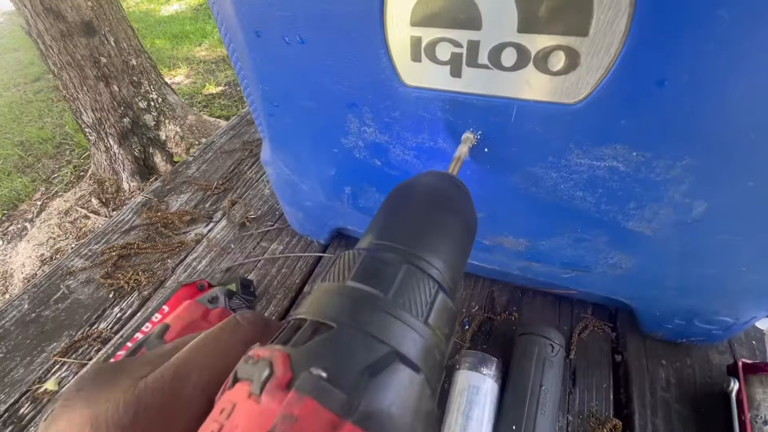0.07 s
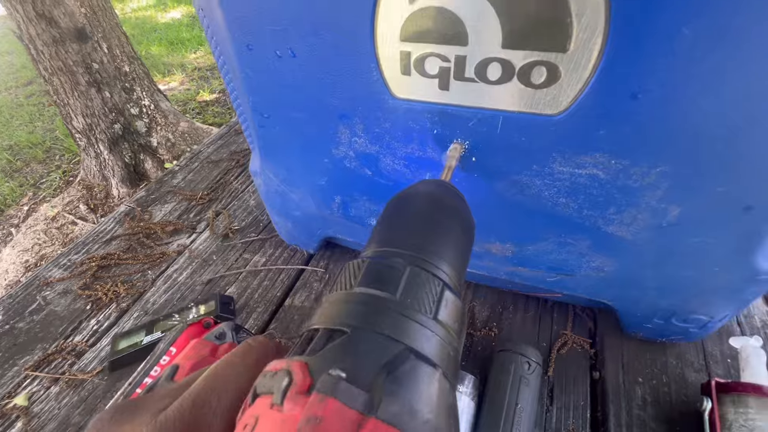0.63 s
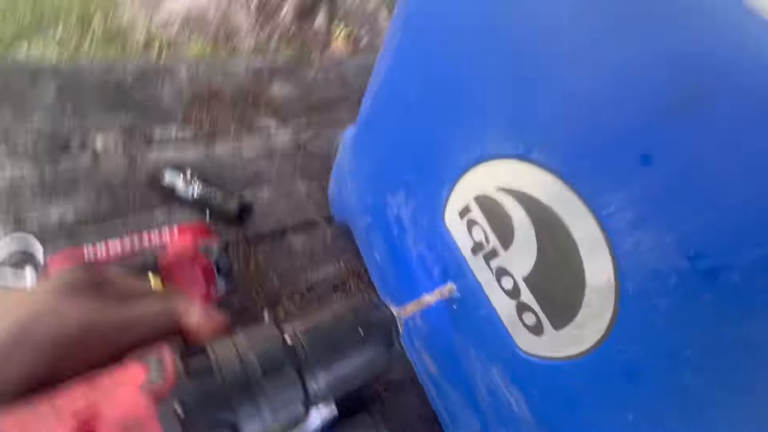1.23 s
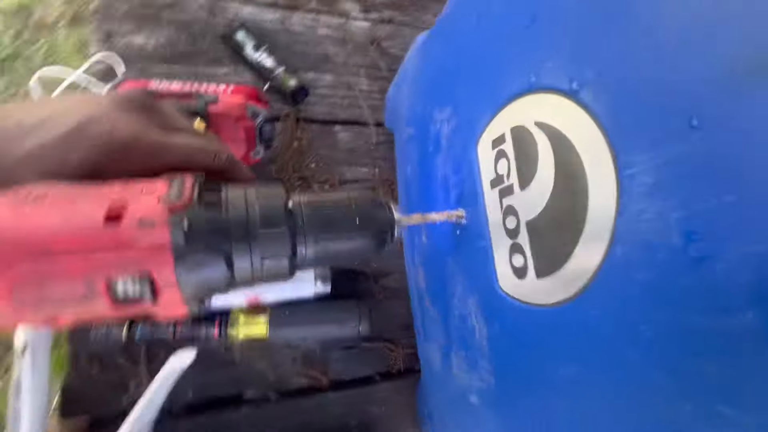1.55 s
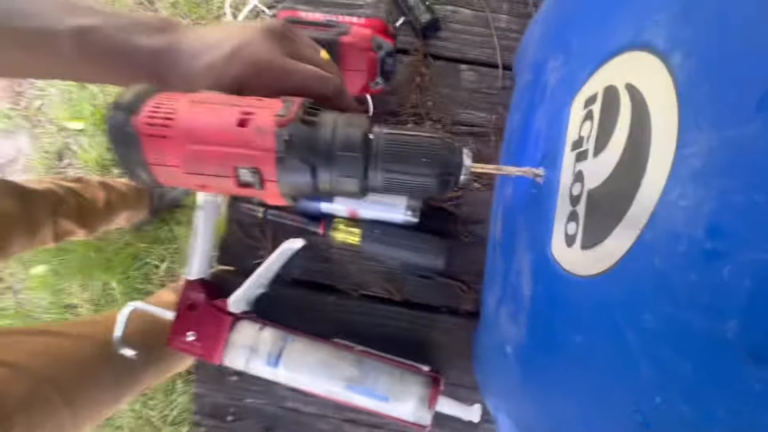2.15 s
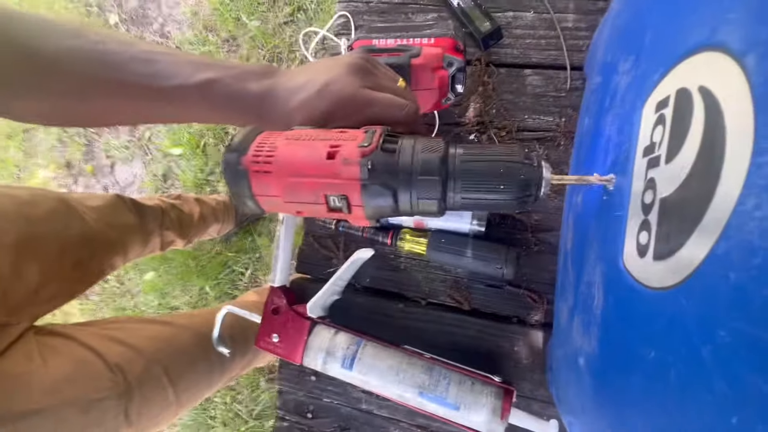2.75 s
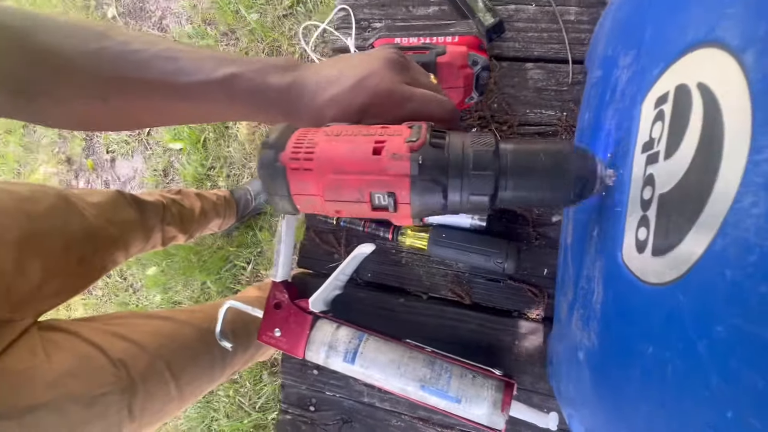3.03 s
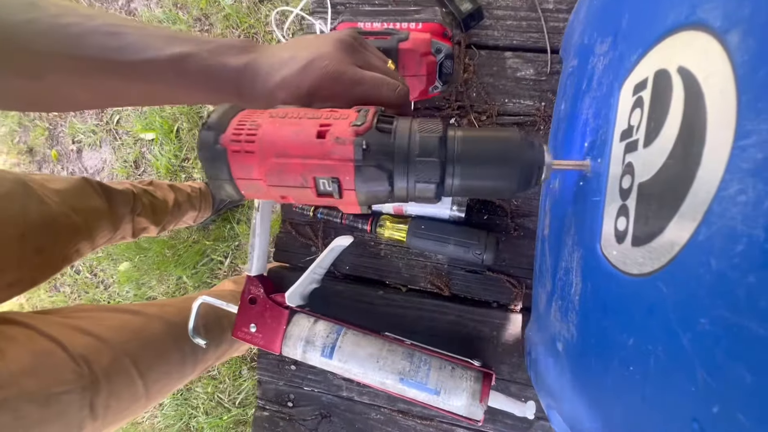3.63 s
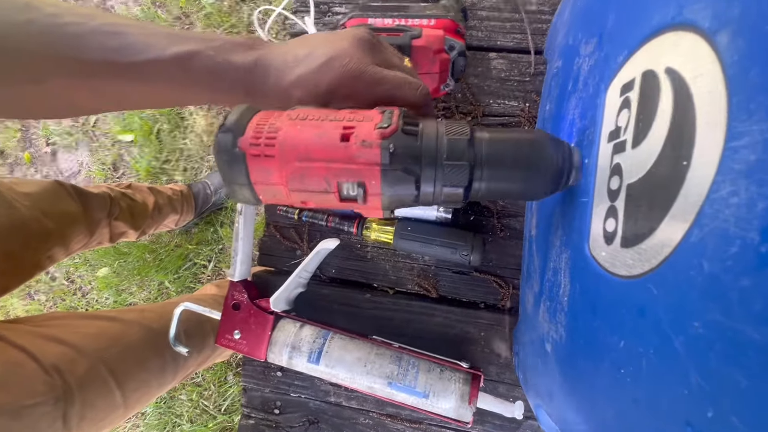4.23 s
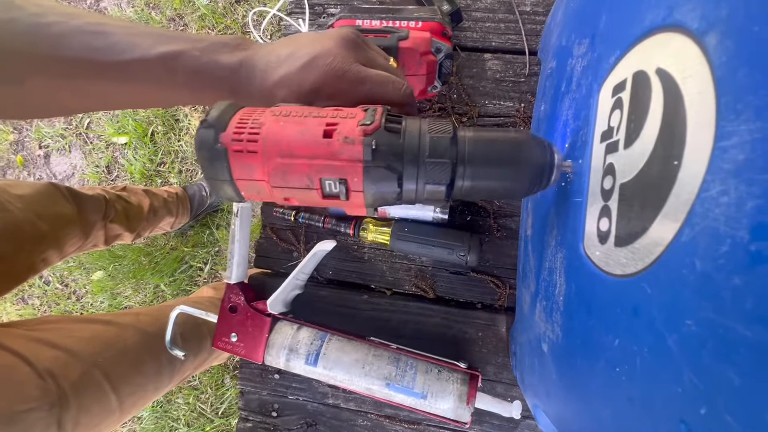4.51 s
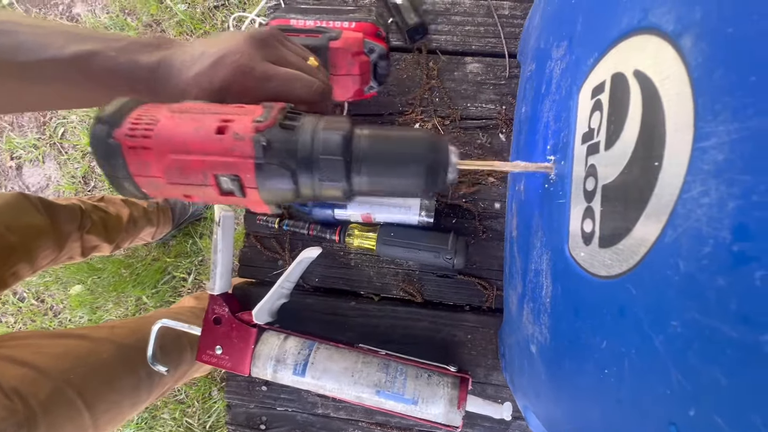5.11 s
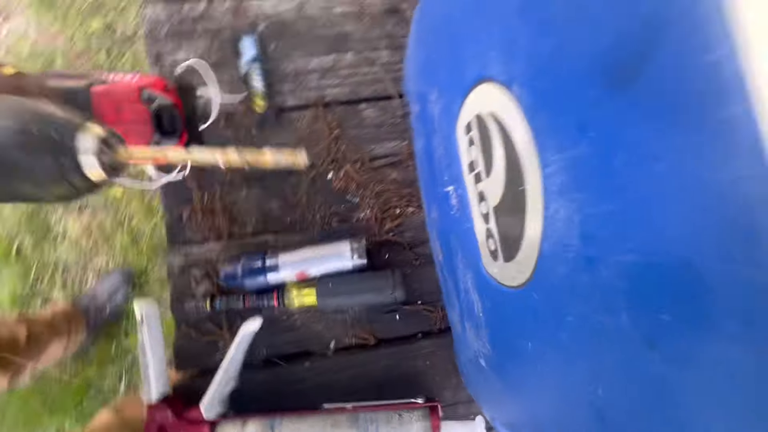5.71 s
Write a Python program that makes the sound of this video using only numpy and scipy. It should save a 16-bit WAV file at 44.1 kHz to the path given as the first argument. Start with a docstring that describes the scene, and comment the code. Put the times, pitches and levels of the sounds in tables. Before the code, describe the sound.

A cordless drill whines and rattles into the hollow plastic wall of a cooler for under a second and stops with a sharp clack. The tool bumps and rubs lightly on the plastic. A brief burst leads into a longer run that slows and partly recovers, with crackling chips, hollow drumming and a thin whistle, ending in another clack. It is outdoors, close to a phone microphone, with handling rumble, soft hiss and a low hum.

```python
"""A cordless drill whines and rattles into a cooler's hollow plastic wall: a short run, a brief burst,
a long run. Outdoors, on a phone's two microphones, close to the tool. The gears follow the motor's
speed, the controller whistles at part trigger, and the bit catches and slips, drumming the wall.
The spindle lock clacks at each stop; between runs the tool bumps and rubs on the cooler.
Behind it all lie handling rumble, a soft hiss and a low outdoor hum."""
import sys
import numpy as np
from scipy import signal
from scipy.fft import rfft, irfft, next_fast_len
from scipy.io import wavfile
from scipy.ndimage import uniform_filter1d

SR = 44100
rng = np.random.default_rng(int(sys.argv[2]) if len(sys.argv) > 2 else 0)


def wav_record(signal):
    """Record a signal, one row per channel, as 16-bit PCM in the file named by sys.argv[1]."""
    frames = np.transpose(np.atleast_2d(signal))
    bounded = np.clip(frames, -1, 1)
    # unit amplitude maps onto the largest positive 16-bit level
    quanta = np.round(bounded * 32767).astype(np.int16)
    wavfile.write(sys.argv[1], SR, quanta)


N = 258029
TIME = np.arange(N) / SR

# Levels are relative: each source adds its own trim and pan.
# motor speed under trigger and load, one curve per run: t/s, f/Hz
MOTOR_SPEED = [
    [(0, 309), (.1, 283), (.19, 247.6), (.24, 224), (.28, 224), (.37, 247.5), (.47, 301), (.55, 316.5),
     (.62, 321.4), (.7, 322.3), (.77, 302)],
    [(2.85, 130), (2.96, 227), (3.04, 246), (3.14, 208)],
    [(3.32, 139), (3.42, 211), (3.53, 295.7), (3.6, 314.7), (3.72, 287.5), (3.82, 270.5), (3.9, 253),
     (4.24, 121), (4.45, 85), (4.65, 145.5), (4.73, 164.7), (4.82, 173), (4.97, 182.5), (5.1, 189.8),
     (5.22, 197.5), (5.31, 190.5)],
]
# trigger pulls, levels at full speed: start/s, stop/s, rattle/dB, chips/dB, drumming/dB
TRIGGER_PULLS = [(-0.1, 0.768, -27.5, -29, -30), (2.857, 3.126, -26, -25.5, -22.5),
                 (3.315, 5.303, -26, -26, -24)]
# gear whine, order 12 being the pinion's tooth mesh: multiple of the motor's turn, level/dB
GEAR_ORDERS = [(4, 6), (5, -3), (6, -1), (9, -9), (11, -11), (12, 0), (15, -10), (17, -10), (19, -11),
               (20, -11), (21, -9), (23, -5), (24, -5.5), (26, -5), (27, -7), (28, -11), (32, -8), (34, -6),
               (38, -11)]
# resonances the whine swells through: f/Hz, width/Hz, level/dB
WHINE_MODES = [(3750, 450, 1.5), (5200, 450, 1)]
# broad colour of the drill's shell: f/Hz, level/dB
HOUSING_COLOUR = [(300, -57), (1000, -7.5), (2000, -2.5), (2800, 0), (4300, 3), (6500, 3), (8000, -4),
                  (9500, -16), (15800, -8.5)]
# resonances of the shell: f/Hz, width/Hz, level/dB
HOUSING_MODES = [(3480, 250, -12.5), (5270, 220, -15), (6050, 300, -18), (7400, 300, -8), (9000, 750, 8.5),
                 (11440, 480, 13.5), (15200, 310, 6.5)]
# whistle at part trigger: start/s, stop/s, first level/dB, last level/dB
WHISTLES = [(0.257, 0.42, -33.5, -41), (2.75, 2.92, -49.5, -36), (4.247, 4.422, -50, -43),
            (4.425, 4.73, -37.5, -38), (4.774, 5.258, -42.5, -35.5)]
# resonances of bit and cut edge in the first hole: f/Hz, width/Hz, level/dB
FIRST_CUT_MODES = [(756, 340, -10.5), (1216, 54, -5.5), (1269, 48, -1.5), (1690, 61, -10.5)]
# the same in the second hole: f/Hz, width/Hz, level/dB
SECOND_CUT_MODES = [(802, 36, 3.7), (938, 62, 8.1), (1320, 430, 9.2), (1800, 120, 4.1)]
# a large chip tears off: t/s, level/dB, f/Hz
CRUNCHES = [(3.14, -25.5, 1200), (3.357, -25.5, 860), (3.432, -22, 1410), (3.597, -25, 950),
            (3.682, -24, 1680), (3.933, -31, 1150), (3.988, -21.5, 1430), (4.323, -27, 920),
            (4.566, -25.5, 644), (4.577, -20.5, 1400), (4.633, -26, 1377), (4.673, -21.5, 1534),
            (4.982, -28, 1500), (5.019, -23, 1340), (5.308, -25.5, 1150), (5.316, -27.5, 840)]
# modes of the hollow wall: f/Hz, width/Hz, level/dB
WALL_MODES = [(191.3, 29, 4.5), (267, 47, -8), (321.7, 37.3, -5.5), (426.4, 72, -9), (497, 13, -20)]
# the bit catches and drums harder: start/s, stop/s, boost/dB
CATCHES = [(0.45, 0.76, 2), (3.102, 3.15, 6), (3.318, 3.47, 3), (3.513, 3.637, 3), (4.13, 4.22, 3),
           (4.36, 4.448, 5), (4.6, 4.787, 3.5), (4.97, 5.007, 7.5), (5.052, 5.134, 5), (5.19, 5.257, 6)]
# the bit snags or the tool knocks: t/s, thump/dB, crack/dB, rebound f/Hz, mode tilt/(dB per octave)
KNOCKS = [(0.776, -6.5, -15.5, 232, 12), (0.796, -1.5, -25, 310, 3.5), (1.22, -42, -70, 217, -3),
          (1.465, -22.5, -60, 300, 0), (1.602, -31, -64, 370, 16), (1.96, -31, -54, 280, 11),
          (2.614, -3, -9.5, 383, 18), (2.706, -16, -23.5, 310, 18), (2.853, -10, -23.5, 280, 8),
          (3.103, -2, -18, 264, 15), (3.115, -6, -15, 313, -10), (3.138, 4.5, -10.5, 456, 4.5),
          (3.314, -14, -21, 452, 7), (3.405, -1, -23, 258, 20), (4.167, -5, -38, 239, 6),
          (4.193, -10, -42, 200, 2), (4.221, -14.5, -33, 220, 1), (4.631, -18.5, -36, 300, 2),
          (4.957, -6, -41, 201.9, 14), (5.054, -5.5, -38, 196, -11), (5.582, -25, -41, 260, 3),
          (5.628, -25, -35.5, 231, 6), (5.688, -26, -36, 240, -6), (5.776, -22, -59, 300, 3),
          (5.801, -30, -58, 240, 4)]
# growl through the seated bit, at full depth: multiple of the motor's turn, level/dB
GROWL_ORDERS = [(3, -52), (4, -57), (5, -50), (6, -52), (12, -55)]
# plastic creaks at rest or squeals under the bit: start/s, stop/s, first f/Hz, last f/Hz, level/dB
CREAKS_AND_SQUEALS = [(1.744, 1.765, 528, 542, -44), (4.057, 4.076, 558, 537, -23),
                      (4.12, 4.17, 485.5, 445, -29), (4.476, 4.56, 468.3, 579, -37.5),
                      (4.635, 4.655, 442, 442, -24), (4.68, 4.698, 454, 442, -25)]
# clacks and clicks of spindle lock, chuck and trigger: t/s, level/dB
CLACKS = [(0.7695, -28), (0.7723, -11), (0.8205, -35), (2.616, -23), (2.6678, -30), (2.779, -45),
          (2.849, -32.5), (3.1374, -16), (3.14, -18), (3.315, -31), (5.314, -13), (5.3173, -30)]
# light taps of handling: t/s, level/dB, f/Hz
TICKS = [(1.352, -42, 340), (1.4625, -30.5, 486), (1.604, -48, 430), (1.742, -44, 1310), (1.744, -46, 8600),
         (2.095, -26.5, 1510), (2.1165, -25.5, 1440), (5.458, -46, 500), (5.564, -44, 900),
         (5.6214, -44, 2600), (5.69, -44, 890)]
# the tool slides over the cooler: start/s, stop/s, level/dB
SLIDES = [(1.97, 2.16, -50.5), (2.47, 2.52, -51.5), (2.615, 2.645, -36.5)]
# the tool scrapes on the cooler: start/s, stop/s, level/dB
SCRAPES = [(5.642, 5.795, -43)]
# the hand shakes the phone: start/s, stop/s, level/dB
SHAKES = [(0.45, 0.95, -46.5), (1.14, 1.68, -46), (3.1, 3.7, -44.5), (4.53, 4.62, -34), (4.76, 5.23, -35.5),
          (4.93, 5.08, -34), (5.57, 5.66, -35.5), (5.66, 5.85, -40), (5.76, 5.84, -32)]
# air and handling on the microphones: f/Hz, level/dB
RUMBLE_COLOUR = [(22, -22), (50, 0), (75, 2), (100, 2), (130, -6), (220, -11.5), (450, -27.5), (900, -58),
                 (2000, -79)]
# spectrum of the outdoor hiss: f/Hz, level/dB
HISS_COLOUR = [(100, 14.5), (500, 10), (1000, 5), (1700, 2.5), (3000, -4), (6500, -2.5), (9000, -6.5),
               (11000, -24), (16000, -24)]
# rise and fall of that hiss: t/s, level/dB
HISS_LEVEL = [(1.0, -56), (2.4, -49), (3.2, -43.5), (5.5, -48.5)]

FULL_SPEED_HZ, SWITCH_HZ = 300, 3936.5
SPIN_UP_S, BITE_S, SPIN_DOWN_S = 0.021, 0.0024, 0.012
MOVE_S, SINK_S, THROUGH_S = 2, 3.34, 5.26  # on to the second hole; the bit sinks in; it breaks through
# level change with the motor and the bit: dB per octave of speed, dB at full depth
RATTLE_LAW, WHINE_LAW, CHIP_LAW, DRUM_LAW = (7.7, -3), (8, 0), (4.5, -7.5), (4.17, -2.4)
FIRST_TILT_DB, SECOND_TILT_DB = 0.5, 5  # per octave across the wall's modes, at each hole
TILT_LAW = (-12.5, -19)  # a slow bit favours the upper modes, a deep one the lowest
WHINE_DB, GRIT_DB, UNBALANCE_DB, FLUTE_DB, GROWL_SHALLOW_DB = -30.8, -8.5, -1.5, -42.5, 3
RUMBLE_DB, HUM_DB, HUM_HZ, HUM_WIDTH_HZ = -47, -44, 97.9, 19
FIRST_PHASE_RAD, SECOND_PHASE_RAD = 0.39, 2.08  # wall sound between the microphones, at each hole
MIC_LAG_SAMPLES, TOP_HZ = 14, 15900


def gears(motor_hz, depth, rattle_gain, whine_gain):
    """Close up, loose teeth rattle, grittier as the bit sinks; meshing teeth whine with the motor."""
    turns = np.cumsum(motor_hz * (1 + .001 * walk(200))) / SR
    throb = undb(0.33 * np.sin(2 * np.pi * turns / 14) + 0.21 * np.sin(2 * np.pi * turns)
                 + 0.79 * walk(60))
    rattle = mics(lambda: housing(grains(rate=9000, spread_db=-0.5)), likeness=0.23, pan_db=-1.5)
    grit = mics(lambda: housing(grains(rate=640, spread_db=3.5)), likeness=0.52, pan_db=7)
    rattle += undb(GRIT_DB) * depth * grit
    backlash_rad = 0.28 * walk(350)  # play between the teeth shakes each tone
    teeth = sum(undb(db + 2.5 * walk(25))
                * np.sin(2 * np.pi * (order * turns + rng.random()) + backlash_rad)
                for order, db in GEAR_ORDERS)
    whine = housing(teeth + resonate(teeth, WHINE_MODES))
    left, right = throb * (undb(4) * rattle_gain * rattle + whine_gain * whine)
    shade = undb(-5)  # the phone's body shades the right microphone in the presence range
    return np.array([left + shade * ring(left, 4560, 930), right - shade * ring(right, 5480, 5300)])


def housing(x):
    """The gears reach the microphones through the drill's resonant shell."""
    return unit(colour(x + resonate(x, HOUSING_MODES), HOUSING_COLOUR))


def controller():
    """At part trigger the current is chopped, and the windings whistle at the switching rate."""
    phase = 2 * np.pi * SWITCH_HZ * TIME
    tone = np.sqrt(2) * (np.sin(phase) + undb(-19.5) * np.sin(2 * phase)) * undb(1.4 * walk(30))
    gain = sum(gate(start, stop, rise_s=0.0035, fall_s=0.0034)
               * undb(np.interp(TIME, [start, stop], [first_db, last_db]))
               for start, stop, first_db, last_db in WHISTLES)
    return tone * gain * undb([[2.5], [-4]])


def cutting(gain, depth):
    """Torn chips crackle through the resonances of bit and hole; now and then a large one snaps."""
    def chips():
        tears = grains(rate=1300, spread_db=3.5)
        first = unit(band(resonate(tears, FIRST_CUT_MODES), 720, 2370))
        second = unit(band(resonate(tears, SECOND_CUT_MODES), 720, 2370))
        return np.where(TIME < MOVE_S, first, second)
    crunches = mics(lambda: snaps(CRUNCHES, decay_s=0.01, octaves=0.76), likeness=0.4, pan_db=-1.5)
    fits_db = (1.2 + 0.69 * depth) * walk(45)  # a deep bit cuts in fits
    crackle = mics(chips, likeness=0.58, pan_db=1.5)
    return gain * undb(1 + fits_db) * crackle + undb(0.5) * crunches


def wall(motor_hz, gain, tilt_db):
    """The bit catches and slips until it breaks through; these pushes and odd knocks ring the wall."""
    catch_db = sum(db * gate(start, stop, BITE_S, SPIN_DOWN_S) for start, stop, db in CATCHES)
    in_wall = np.exp(-np.maximum(TIME - THROUGH_S, 0) / SPIN_DOWN_S)
    slips = undb(25) * unit(grains(rate=700, spread_db=1))
    unbalance = undb(UNBALANCE_DB + 2 * walk(30)) * np.sin(2 * np.pi * np.cumsum(motor_hz) / SR)
    sound = panel((slips + unbalance) * gain * in_wall * undb(catch_db + 1.6 * walk(25)), tilt_db)
    age = TIME[:SR // 4]
    for s, thump_db, _, hz, knock_tilt_db in KNOCKS:
        push = undb(thump_db + 7.5) * np.sin(2 * np.pi * hz * age) * np.exp(-age / 0.0027)
        at = int(s * SR)
        sound[at:at + len(age)] += panel(push, knock_tilt_db)[:N - at]
    sound = band(band(sound, 118, 462), 118, 462)
    # so close to the flexing panel the two microphones are out of step
    phase = np.where(TIME < MOVE_S, FIRST_PHASE_RAD, SECOND_PHASE_RAD)
    turn = np.exp(1j * phase * np.array([[.5], [-.5]]))
    pair = np.real(signal.hilbert(sound, next_fast_len(N))[:N] * turn)
    return pair / np.cos(np.clip(phase, 0, 2) / 2) * pan(-1)


def panel(push, tilt_db):
    """A push rings the wall's modes, their weights tilted in dB per octave at constant power."""
    weights = np.array([undb(db + tilt_db * np.log2(hz / 250)) for hz, _, db in WALL_MODES])
    weights /= np.sqrt(np.sum(weights ** 2, axis=0))
    return sum(weight * ring(push, hz, width) for weight, (hz, width, _) in zip(weights, WALL_MODES))


def flutes(depth):
    """The deeper the bit, the more its flutes rub on the side of the hole."""
    rub = mics(lambda: friction(85, 1360, rate=3000, spread_db=7), likeness=0.2, pan_db=2)
    seated = gate(SINK_S, THROUGH_S, BITE_S, SPIN_DOWN_S)
    return undb(FLUTE_DB + walk(40)) * np.sqrt(depth) * seated * rub


def growl(motor_hz, depth):
    """The seated bit passes the motor's low harmonics on to the plastic, most while still shallow."""
    turns = np.cumsum(motor_hz * (1 + .007 * walk(130))) / SR
    tones = sum(undb(db + 3 * walk(45)) * np.sin(2 * np.pi * (order * turns + rng.random()))
                for order, db in GROWL_ORDERS)
    seated = gate(SINK_S, THROUGH_S, SPIN_UP_S, SPIN_DOWN_S)
    return np.sqrt(2) * tones * seated * undb(GROWL_SHALLOW_DB * (1 - depth))


def creaks_and_squeals():
    """The plastic creaks at rest or squeals under the turning bit, in short, rough glides."""
    hz = curve([point for start, stop, first_hz, last_hz, _ in CREAKS_AND_SQUEALS
                for point in ((start, first_hz), (stop, last_hz))])
    phase = 2 * np.pi * np.cumsum(hz * (1 + 0.04 * walk(200))) / SR
    levels = [(start, stop, db) for start, stop, _, _, db in CREAKS_AND_SQUEALS]
    gain = spells(levels, rise_s=0.0026, fall_s=0.0059)
    tone = np.sin(phase) + undb(-18) * (np.sin(2 * phase) + np.sin(3 * phase))
    return np.sqrt(2) * gain * tone * undb(3.2 * walk(120))


def impacts():
    """Sharp clacks and clicks of spindle lock, chuck and trigger; cracks on plastic; light ticks."""
    def strike(low_hz, high_hz, pan_db):
        return mics(lambda: unit(band(noise(), low_hz, high_hz)), likeness=0.29, pan_db=pan_db)
    sharp = strike(3630, 6700, pan_db=5) + undb(-14) * strike(7750, 13400, pan_db=-1)
    clacks = sharp * bursts(*np.transpose(CLACKS), decay_s=.0028, rise_s=.001)
    knock_s, _, crack_db, _, _ = np.transpose(KNOCKS)
    plastic = strike(694, 1600, pan_db=-1.5)
    cracks = plastic * bursts(knock_s + 0.0006, crack_db, decay_s=0.0056, rise_s=0.013)
    ticks = mics(lambda: snaps(TICKS, decay_s=0.0037, octaves=0.61), likeness=0.63, pan_db=8)
    return undb(1) * clacks + undb(-0.5) * cracks + ticks


def rubbing():
    """The tool drags over the cooler: soft, hissing slides and a short, grainy scrape."""
    def sliding():
        body = friction(500, 1900, rate=2200, spread_db=3.5)
        return body + undb(-5) * friction(5000, 9600, rate=4200, spread_db=0)
    slide = mics(sliding, likeness=0.17, pan_db=-2.5)
    scrape = mics(lambda: friction(1600, 2310, rate=2900, spread_db=7), likeness=0.75, pan_db=-2.5)
    return (slide * spells(SLIDES, rise_s=0.021, fall_s=0.03)
            + scrape * spells(SCRAPES, rise_s=0.0016, fall_s=0.004))


def yard(x, t60_s, wet_db):
    """Nearby surfaces scatter a short, weak tail back to the microphones."""
    age = TIME[:SR // 2]
    tail = rng.standard_normal((2, len(age))) * undb(-60 * age / t60_s) * (age > .003)
    tail /= np.sqrt(np.sum(tail ** 2, axis=1, keepdims=True))
    return x + undb(wet_db) * signal.fftconvolve(x, tail, axes=1)[:, :N]


def handling():
    """Right at the microphones, air and the shaking hand rumble and the grip rustles."""
    mid, side = (unit(colour(noise(), RUMBLE_COLOUR)) for _ in range(2))
    shaking = undb(RUMBLE_DB) + spells(SHAKES, rise_s=0.0065, fall_s=0.017)
    opposed = side * np.array([[1], [-1]])  # a shake pushes the two microphones in opposite directions
    rumble = (mid + undb(3.5) * opposed) * pan(3) * undb(-2.5 + 2 * walk(16))
    rustle = mics(lambda: friction(250, 590, rate=400, spread_db=-0.5), likeness=0.46, pan_db=3)
    return shaking * (rumble + rustle * undb(-27.5 + 2.4 * walk(18)))


def outdoors():
    """The bed of the place: a wide, soft hiss and an uneven low hum that sinks for a while."""
    hiss = mics(lambda: unit(colour(noise(), HISS_COLOUR)), likeness=0.027, pan_db=1)
    hiss *= undb(curve(HISS_LEVEL) + 1.5 * walk(15))
    lull_db = -16 * gate(start=1.8, stop=2.45, rise_s=0.04, fall_s=0.28)
    hum = unit(ring(ring(noise(), HUM_HZ, HUM_WIDTH_HZ), HUM_HZ, HUM_WIDTH_HZ))
    return hiss + hum * undb(HUM_DB + lull_db) * pan(3)


def mics(source, likeness, pan_db):
    """Direct sound (power share: likeness) reaches the left microphone first; the rest is scattered."""
    direct = source()
    direct_pair = np.array([direct, np.roll(direct, MIC_LAG_SAMPLES)])
    scattered = np.array([source(), source()])
    return (np.sqrt(likeness) * direct_pair + np.sqrt(1 - likeness) * scattered) * pan(pan_db)


def pan(db):
    """Gains that set the left microphone db above the right."""
    return undb([[db / 2], [-db / 2]])


def undb(db):
    """Decibels to gain."""
    return np.exp(np.asarray(db) * (np.log(10) / 20))


def unit(x):
    """Scale to rms 1."""
    return x / np.sqrt(np.mean(x ** 2))


def curve(rows):
    """Rows of (t/s, value), joined by straight lines."""
    return np.interp(TIME, *np.transpose(rows))


def noise():
    """White noise."""
    return rng.standard_normal(N)


def walk(rate):
    """Smooth random drift with a spread near 1, rate steps per second."""
    step = max(int(SR / rate), 2)
    return 1.305 * uniform_filter1d(np.repeat(rng.standard_normal(N // step + 1), step), step)[:N]


def grains(rate, spread_db):
    """Random clicks of uneven size, rate per second."""
    hit = rng.random(N) < rate / SR
    size, spread = rng.standard_normal((2, N))
    return hit * size * undb(spread_db * spread.clip(-2, 2))


def friction(low_hz, high_hz, rate, spread_db):
    """Rubbing: dense clicks in one band, at rms 1."""
    return unit(band(grains(rate, spread_db), low_hz, high_hz))


def colour(x, points):
    """Shape a sound by a spectrum of (f/Hz, level/dB) points."""
    hz, db = np.transpose(points)
    size = next_fast_len(N)
    bin_hz = np.fft.rfftfreq(size, 1 / SR)
    return irfft(rfft(x, size) * undb(np.interp(np.log(bin_hz + 1), np.log(hz), db)), size)[:N]


def ring(x, hz, width):
    """One resonance, gain 1 at its centre."""
    return signal.lfilter(*signal.iirpeak(hz, hz / width, fs=SR), x + 1e-18)


def resonate(x, modes):
    """Parallel resonances: rows of (f/Hz, width/Hz, level/dB)."""
    return sum(undb(db) * ring(x, hz, width) for hz, width, db in modes)


def band(x, low_hz, high_hz):
    """Band-pass with second-order skirts."""
    return signal.sosfilt(signal.butter(2, [low_hz, high_hz], "band", fs=SR, output="sos"), x + 1e-18)


def gate(start, stop, rise_s, fall_s):
    """Attack from the start, hold, release after the stop."""
    first, last = np.searchsorted(TIME, [start, stop + 10 * fall_s])
    t, out = TIME[first:last], np.zeros(N)
    out[first:last] = (1 - np.exp((start - t) / rise_s)) * np.exp(-np.maximum(t - stop, 0) / fall_s)
    return out


def spells(rows, rise_s, fall_s):
    """A gain envelope from rows of (start/s, stop/s, level/dB)."""
    return sum(undb(db) * gate(start, stop, rise_s, fall_s) for start, stop, db in rows)


def bursts(times, db, decay_s, rise_s):
    """An envelope that swells quickly at each time and decays."""
    kicks = np.zeros(N)
    kicks[(times * SR).astype(int)] = undb(db)
    decays = signal.lfilter([1], [1, -np.exp(-1 / (decay_s * SR))], kicks + 1e-18)
    return uniform_filter1d(decays, int(rise_s * SR))


def snaps(rows, decay_s, octaves):
    """Very short bursts of noise, each around its own pitch: rows of (t/s, level/dB, f/Hz)."""
    out, age, half_band = np.zeros(N), TIME[:SR // 10], 2 ** (octaves / 2)
    for s, db, hz in rows:
        burst = rng.standard_normal(len(age)) * np.exp(-age / decay_s)
        burst = band(burst, hz / half_band, hz * half_band)
        burst *= undb(db) * np.sqrt(decay_s * SR / 2 / np.sum(burst ** 2))
        at = int(s * SR)
        out[at:at + len(age)] += burst[:N - at]
    return out


def scene():
    """Motor speed and bit depth drive the drill and cooler up close; the outdoors lies behind."""
    motor_hz = curve([point for run in MOTOR_SPEED for point in run])
    octaves = np.log2(motor_hz / FULL_SPEED_HZ)
    depth = np.interp(TIME, [SINK_S, THROUGH_S], [0, 1])
    starts, stops, rattle_db, chip_db, drum_db = np.transpose(TRIGGER_PULLS)

    def change(law):
        per_octave, at_full_depth = law
        return per_octave * octaves + at_full_depth * depth

    def driven(run_db, law, rise_s=SPIN_UP_S):
        return spells(zip(starts, stops, run_db), rise_s, SPIN_DOWN_S) * undb(change(law))
    whine_gain = driven([WHINE_DB] * len(starts), WHINE_LAW)
    drill = gears(motor_hz, depth, driven(rattle_db, RATTLE_LAW), whine_gain) + controller()
    chips = cutting(driven(chip_db, CHIP_LAW), depth)
    tilt_db = np.where(TIME < MOVE_S, FIRST_TILT_DB, SECOND_TILT_DB) + change(TILT_LAW)
    drumming = wall(motor_hz, driven(drum_db, DRUM_LAW, BITE_S), tilt_db)
    plastic = chips + drumming + flutes(depth) + growl(motor_hz, depth) + creaks_and_squeals()
    foreground = drill + plastic + impacts() + rubbing()
    return yard(foreground, t60_s=0.12, wet_db=-13) + handling() + outdoors()


def record(dry):
    """The phone rounds the highest peaks and cuts the top."""
    rounded = np.tanh(dry)
    return signal.sosfilt(signal.ellip(10, .2, 80, TOP_HZ, fs=SR, output="sos"), rounded)


dry = scene()
out = record(dry)
wav_record(out)
```